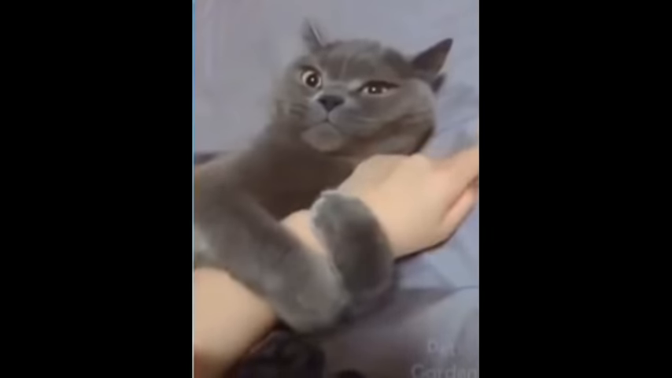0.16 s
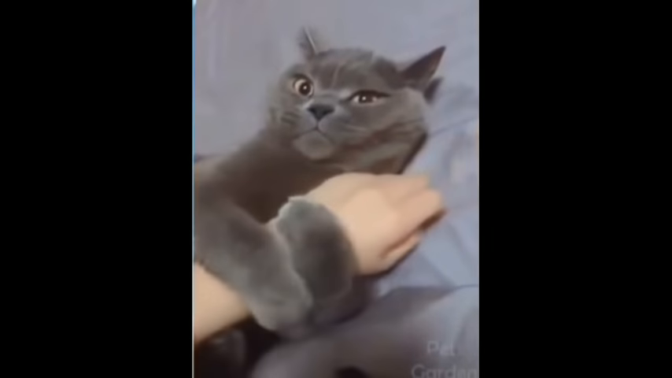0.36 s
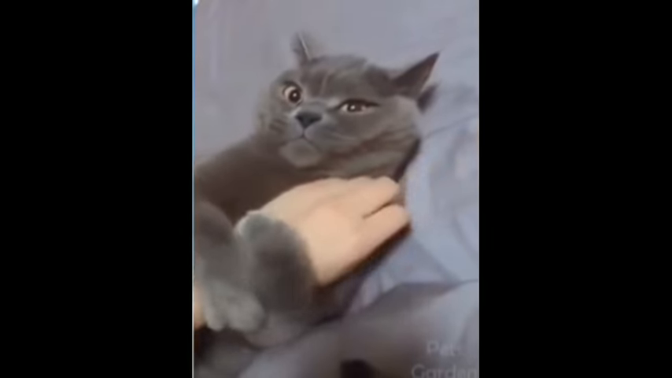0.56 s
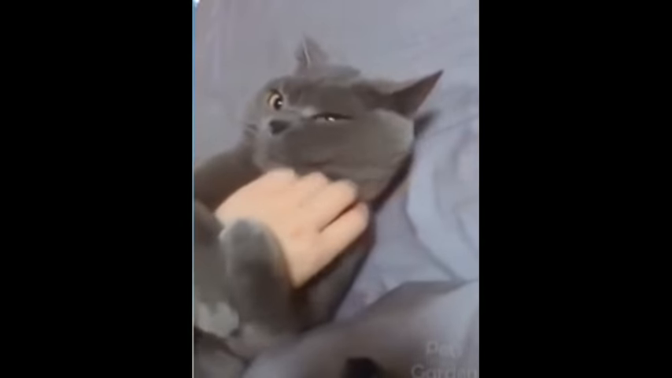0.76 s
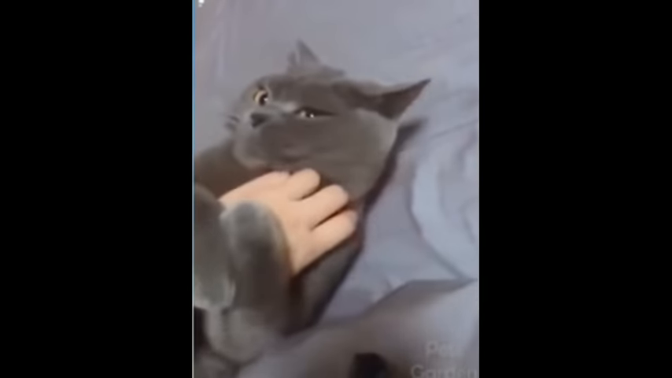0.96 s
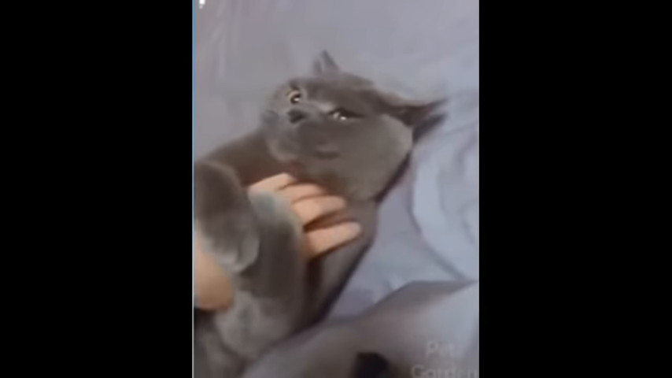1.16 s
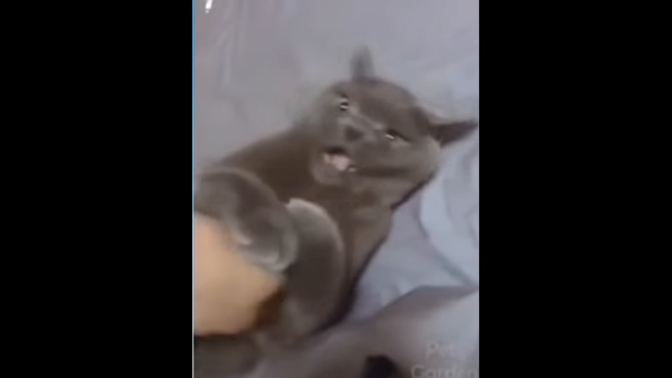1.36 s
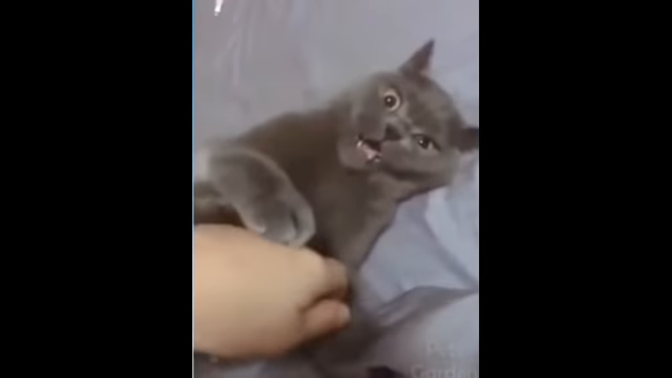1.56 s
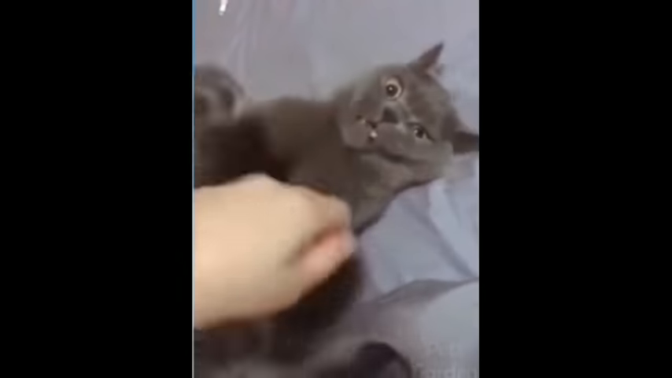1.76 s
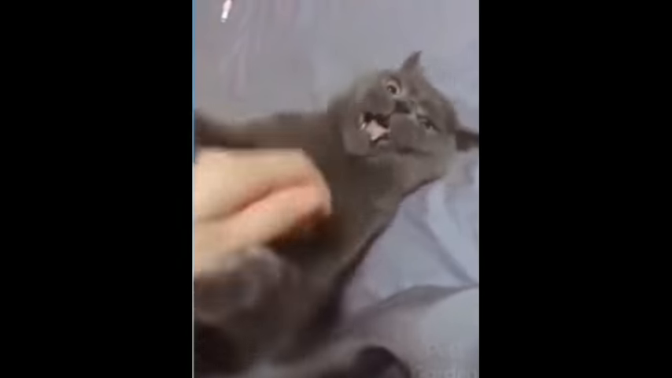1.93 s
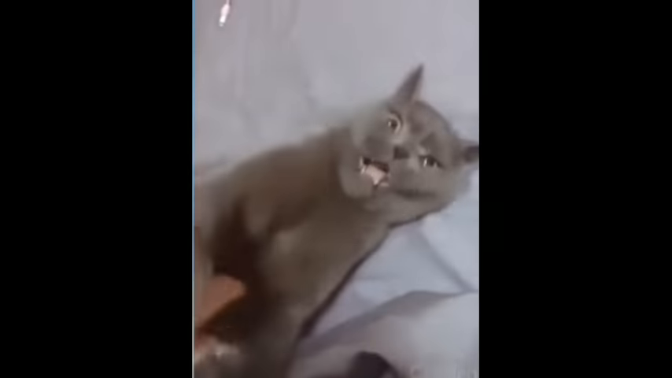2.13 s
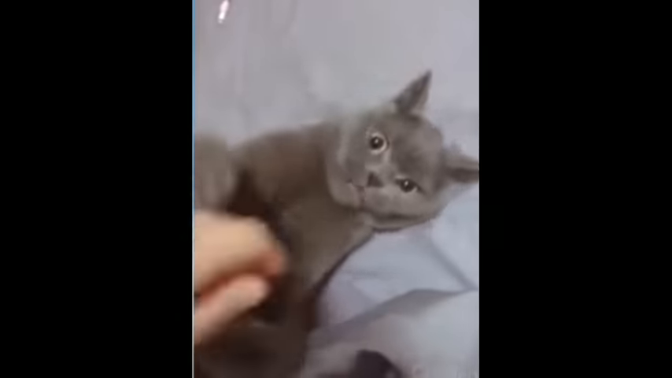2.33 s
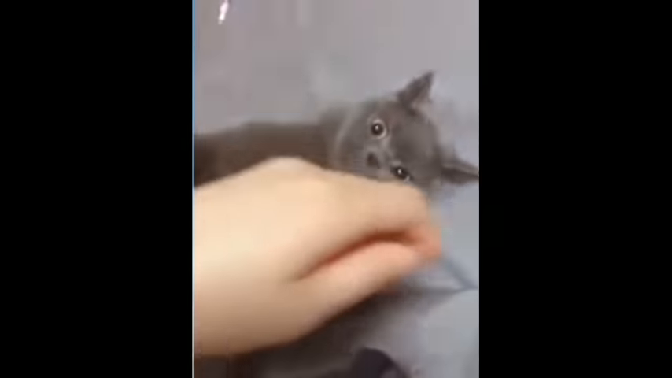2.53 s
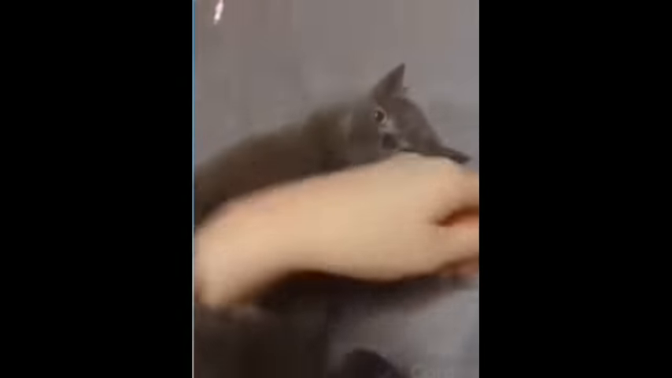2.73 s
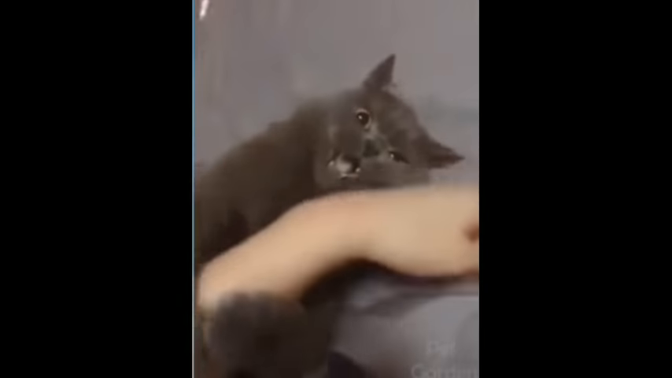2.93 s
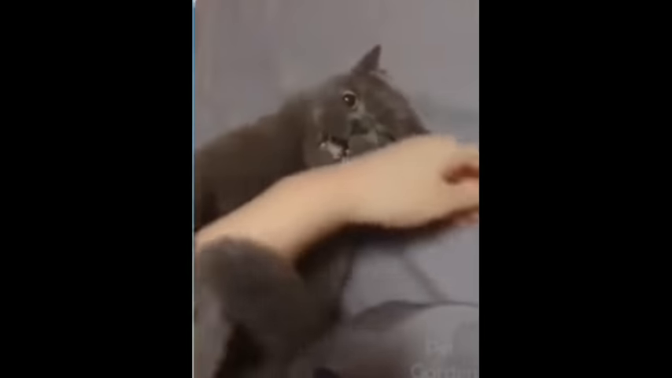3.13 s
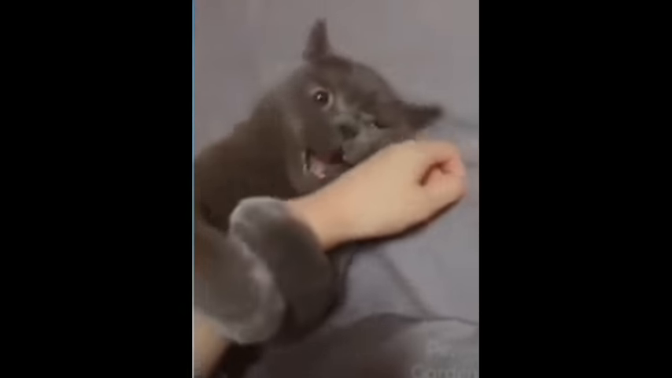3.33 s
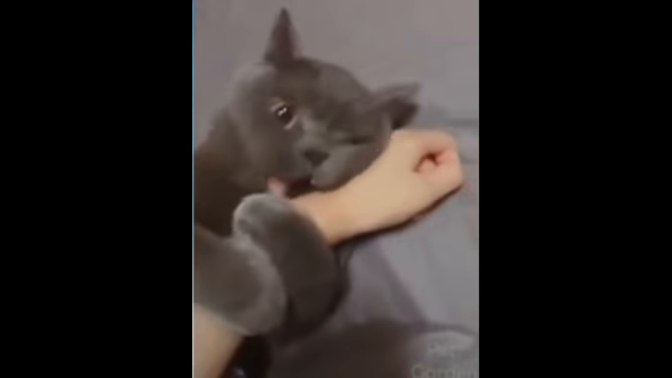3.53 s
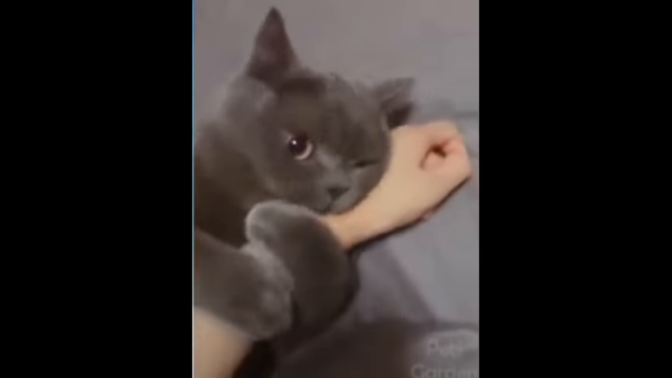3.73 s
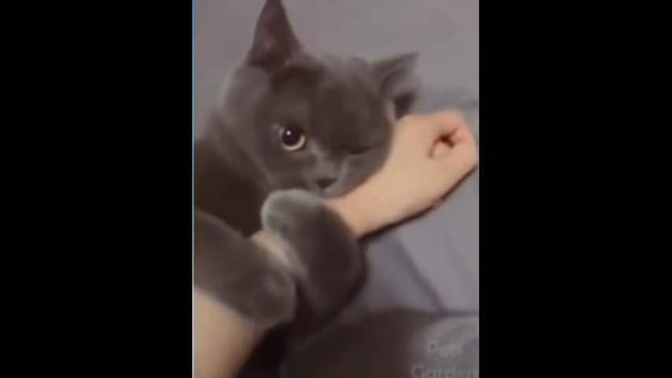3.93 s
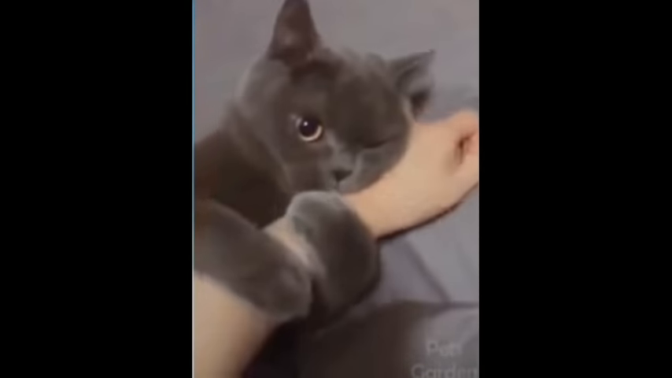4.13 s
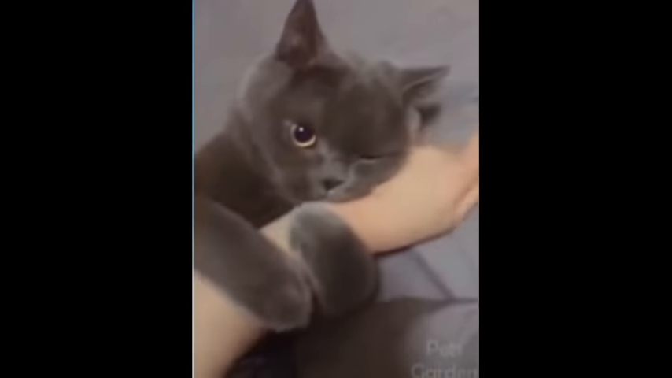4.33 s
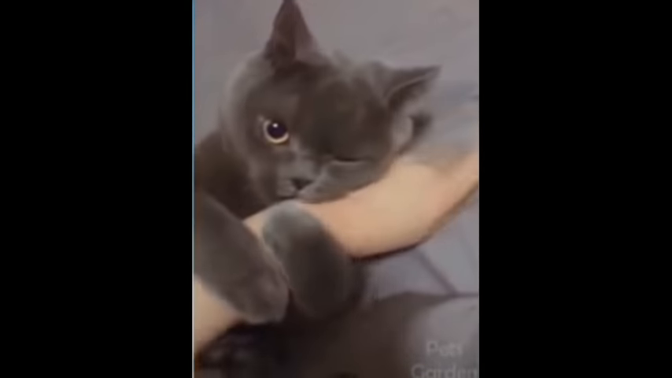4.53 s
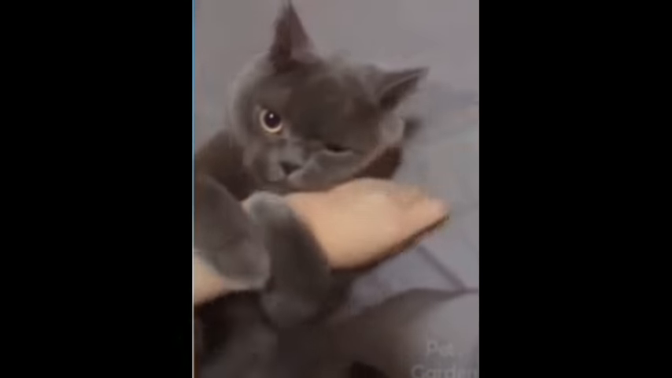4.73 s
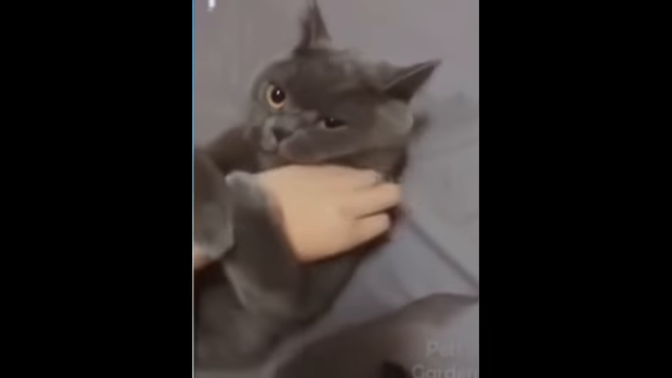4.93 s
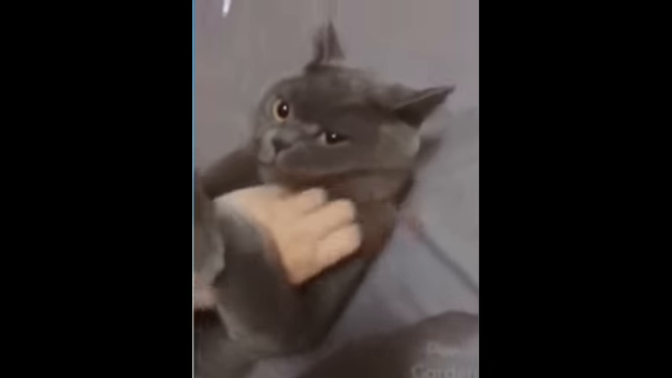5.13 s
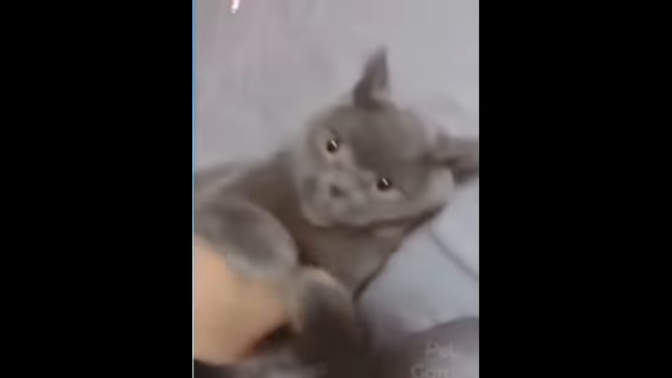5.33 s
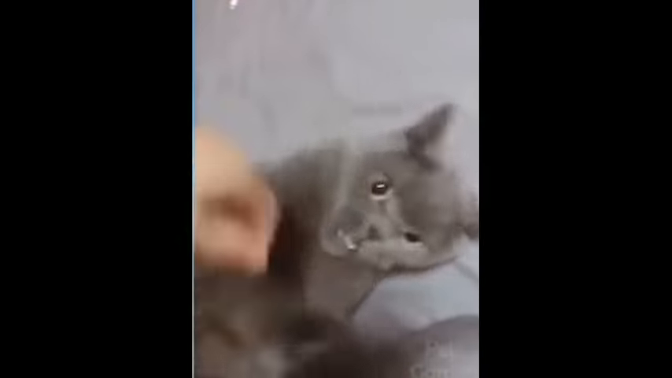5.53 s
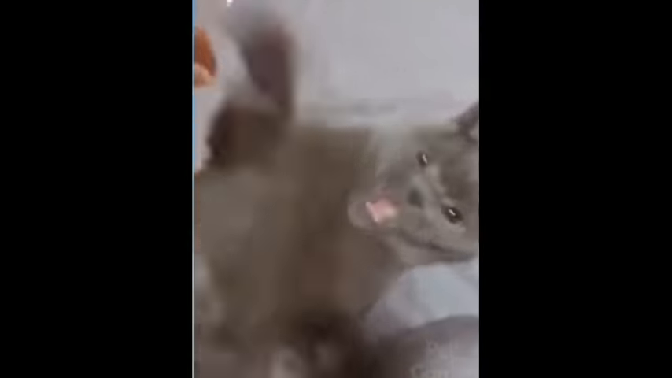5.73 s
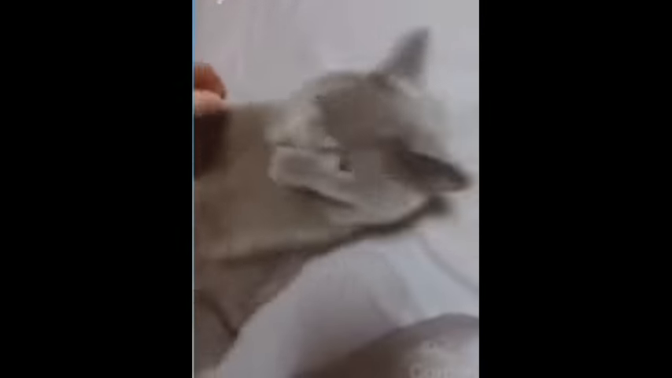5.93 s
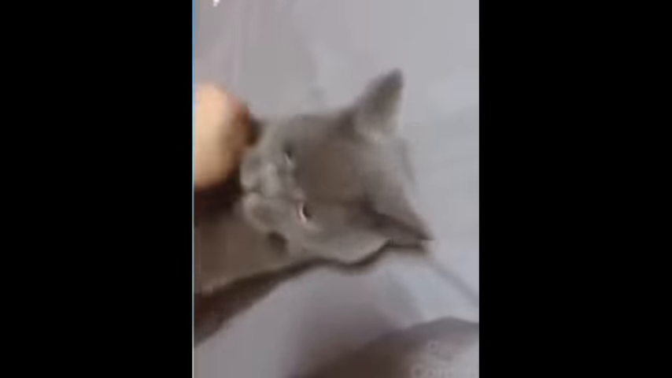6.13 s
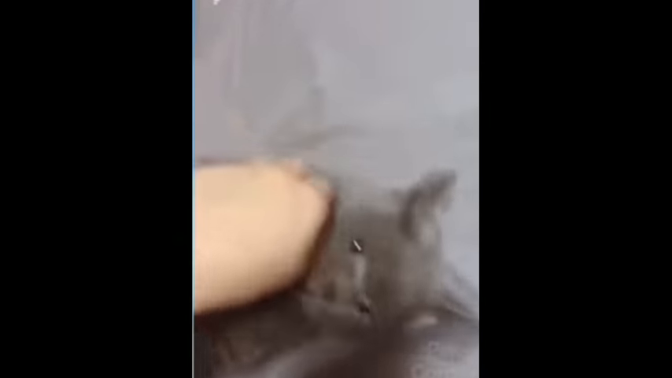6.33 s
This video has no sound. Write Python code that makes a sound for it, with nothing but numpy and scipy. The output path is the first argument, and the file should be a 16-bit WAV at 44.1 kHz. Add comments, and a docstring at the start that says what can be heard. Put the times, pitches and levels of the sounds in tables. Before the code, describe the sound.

Silence for 0.2 s, then quiet indoor room tone fades in abruptly: low rumble, a faint wavering hum and soft hiss. At about 1.0 s a cat, very close, begins a rough, creaky closed-mouth moan that dips low, then opens at 1.5 s into a bright, loud meow climbing in pitch. Without a break, two more wailing meows follow, swelling near 2.1 and 2.3 s, before closing into a nasal moan from 2.6 to 3.05 s. A last meow opens at 3.1 s and fades by 3.5 s. Quiet returns, with tiny fur and blanket rustles around 3.9 to 4.4 s. At 5.1 s a faint rising squeak accompanies a second raspy moan, growing until 5.75 s, when it breaks into a harsher, higher, piercing cry held to the end at about 6.5 s. The room adds only a short, soft echo.

```python
"""In a small room, a cat teased by a hand on a bed gives two long complaining yowls, close by.
Each starts as a rough closed-mouth moan and opens into bright meows: harmonics of the vocal folds
pass through a fixed throat and two moving resonances, and roughen where the voice cracks.
Noise bands make the rumble, air, background hiss and short rustles of fur and blanket;
swept sines make a hum and a squeak. Silence comes first, then the sound fades in quickly."""
import sys
import numpy as np
from scipy import signal
from scipy.fft import rfft, irfft, next_fast_len
from scipy.io import wavfile
from scipy.ndimage import map_coordinates

SR = 44100
rng = np.random.default_rng(int(sys.argv[2]) if len(sys.argv) > 2 else 0)


def to_wav(sig):
    """Store sig (one row per channel, or 1-D mono) as 16-bit WAV at the path in sys.argv[1].

    Samples outside -1..1 are clipped; the rate is SR.
    """
    pcm = np.clip(np.atleast_2d(sig), -1, 1) * 32767
    pcm = np.round(pcm).astype(np.int16)
    wavfile.write(sys.argv[1], SR, pcm.T)  # frames by channels


N = 285768
TIME = np.arange(N) / SR  # s
TOP_HZ = 14000  # upper band limit
SHUT_HZ, OPEN_HZ = 1155, 2640  # mouth resonance in a moan, and with the jaw wide open


def amp(db):
    """Logarithmic level: decibels to amplitude gain."""
    return 10 ** (np.asarray(db) / 20)


def unit(x):
    """Power normalization: scale to rms 1."""
    return x / np.sqrt(np.mean(x ** 2) + 1e-20)


def along(points, hz):
    """Spectral interpolation: read (f/Hz, value) points on a logarithmic frequency axis."""
    point_hz, values = np.transpose(points)
    return np.interp(np.log(hz + 1), np.log(point_hz + 1), values)


def curves(rows, t):
    """Linear interpolation in time: each column after the first, read at times t."""
    seconds, *columns = np.transpose(rows)
    return [np.interp(t, seconds, column) for column in columns]


def wobble(t, rate):
    """Band-limited random fluctuation: a smooth curve through `rate` random knots a second."""
    knots = rng.standard_normal(int(N * rate / SR) + 4)
    return map_coordinates(knots, [t * rate])


def filtered(x, response):
    """Linear filtering: multiply the spectrum of x by a response of frequency."""
    size = next_fast_len(N + SR // 2)
    hz = np.fft.rfftfreq(size, 1 / SR)
    return irfft(rfft(x, size) * response(hz), size)[:N]


def noise(spectrum):
    """Coloured noise: white noise filtered to the given spectral density, at rms 1."""
    white = rng.standard_normal(N)
    return unit(filtered(white, lambda hz: amp(along(spectrum, hz))))


def bell(hz, centre_hz, octaves):
    """Resonance: a hump of height 1 that halves `octaves` from its centre."""
    return 1 / (1 + (np.log2((hz + 1) / centre_hz) / octaves) ** 2)


def rumble():
    """Low-frequency noise whose level fluctuates slowly."""
    # relative spectral density: f/Hz, level/dB (per Hz)
    rumble_colour = [(8, -38.5), (16, 5), (22, 0), (30, -5.5), (42, -5.5), (70, -8), (100, -15.5),
                     (125, -26.5), (200, -63)]
    return amp(-34 + 0.75 * wobble(TIME, 12)) * noise(rumble_colour)


def hum():
    """Frequency modulation: a sine near 161.5 Hz that wavers in pitch and level."""
    pitch = 161.5 + 2 * wobble(TIME, 6.6)
    level = amp(-52.5 + 1.1 * wobble(TIME, 4.7))
    return level * np.sin(2 * np.pi * np.cumsum(pitch) / SR)


def room_air():
    """Broadband noise of the room, nearly steady in level."""
    # relative spectral density: f/Hz, level/dB (per Hz)
    air_colour = [(76, -54), (130, -6.5), (156, -2), (193, -2.5), (232, 0.5), (418, -10), (551, -13.5),
                  (663, -10), (717, -13.5), (995, -10.5), (1290, -11), (1920, -20), (3000, -27),
                  (3900, -62.5), (6600, -120)]
    return amp(-43.5 + 0.17 * wobble(TIME, 4.2)) * noise(air_colour)


def background_hiss():
    """Amplitude modulation: treble noise with a slowly changing level and a small flicker."""
    # mean level of the hiss: t/s, level/dB
    hiss_levels = [(.2, -52), (.98, -52.5), (1.06, -59.5), (1.5, -59.5), (2.8, -60), (3.62, -61.5),
                   (3.75, -58), (3.85, -65.5), (4.3, -61), (4.7, -62), (5.02, -56), (5.25, -58),
                   (5.7, -54.5), (6.48, -61.5)]
    # relative spectral density: f/Hz, level/dB (per Hz)
    hiss_colour = [(1500, -41.5), (2500, -7), (4000, -8), (5200, -12.5), (6600, -12.5), (8700, -16),
                   (11000, -19), (13900, -19)]
    level_db = curves(hiss_levels, TIME)[0] + 1.1 * wobble(TIME, 25)
    return amp(level_db) * noise(hiss_colour)


def background():
    """Superposition of the rumble, the hum, the room's air and the hiss."""
    return rumble() + hum() + room_air() + background_hiss()


def room(x):
    """Reverberation: convolution with noise that decays exponentially at each frequency."""
    # decay time of the furnished room: f/Hz, t60/s
    decay_times = [(200, 0.13), (2500, 0.23), (8000, 0.093)]
    hz, t, grains = signal.stft(rng.standard_normal(SR // 2), SR, nperseg=256)
    decay = amp(-60 * t / along(decay_times, hz)[:, None])
    tail = signal.istft(grains * decay, SR, nperseg=256)[1]
    tail = np.pad(tail / np.linalg.norm(tail), (round(.004 * SR), 0))  # 4 ms delay
    return signal.fftconvolve(x, tail)[:N]


def rustles():
    """Exponential decay: short rustles of fur and blanket as decaying bursts of narrow noise."""
    # rustles: t/s (start), level/dB, f/Hz (centre), t60/s
    rustle_rows = [(2.931, -49, 4980, 0.027), (3.057, -50.5, 5513, 0.046), (3.912, -50.5, 2473, 0.32),
                   (4.003, -44, 2400, 0.0448), (4.128, -49, 2500, .04), (4.237, -48, 2798, 0.0681),
                   (4.332, -49, 3540, 0.057), (5.751, -49.5, 7100, 0.071)]
    out = np.zeros(N)
    for start, db, centre_hz, t60 in rustle_rows:
        age = np.maximum(TIME - start, 0)
        white = rng.standard_normal(N)
        burst = unit(filtered(white, lambda hz: bell(hz, centre_hz, octaves=0.38)))
        attack = 1 - np.exp(-age / 0.00082)
        out += burst * amp(db - 60 * age / t60) * attack
    return out


def squeak():
    """Frequency glide: a faint rising sine with pitch jitter, around the start of the second yowl."""
    # mean glide: t/s, f/Hz, level/dB
    glide = [(5.07, 2510, -120), (5.09, 2520, -51), (5.135, 3020, -54), (5.17, 3050, -120)]
    hz, db = curves(glide, TIME)
    jittered_hz = hz * (1 + .015 * wobble(TIME, 400))
    return amp(db) * np.sin(2 * np.pi * np.cumsum(jittered_hz) / SR)


def shutness(mouth_hz):
    """Mouth resonance as a measure of the jaw: 1 when shut, 0 when wide open."""
    return np.clip((OPEN_HZ - mouth_hz) / (OPEN_HZ - SHUT_HZ), 0, 1)


def pitch_at(t):
    """Vibration rate of the vocal folds, gliding from each moan or meow into the next."""
    # mean fold rate, one list per closed-mouth moan: t/s, f/Hz
    moan_pitch = [
        [(1.05, 434.4), (1.148, 431.4), (1.168, 407), (1.228, 324), (1.27, 259.1), (1.308, 333.5),
         (1.35, 370.5), (1.388, 395), (1.44, 462)],
        [(2.6, 549), (2.66, 526.4), (2.7, 453), (2.832, 374.3), (3.05, 389.1)],
        [(5.16, 480.4), (5.204, 420.3), (5.26, 364.6), (5.294, 340.5), (5.398, 375.2), (5.42, 391),
         (5.45, 400.5), (5.6, 385.4), (5.745, 403.2)],
    ]
    # mean fold rate, one list per meow; the last two are a cry and its held end: t/s, f/Hz
    meow_pitch = [
        [(1.465, 494), (1.511, 532), (1.585, 553.3), (1.627, 632.4), (1.653, 643.4), (1.729, 701.7),
         (1.783, 621), (1.813, 630.5), (1.84, 656)],
        [(1.86, 627), (1.958, 669.7), (1.998, 611.3), (2.03, 640), (2.06, 707), (2.074, 703), (2.09, 655.5),
         (2.12, 660.9), (2.22, 724)],
        [(2.24, 734), (2.27, 705.4), (2.33, 778.3), (2.4, 768), (2.436, 717), (2.446, 706), (2.5, 652),
         (2.516, 630.0), (2.57, 582)],
        [(3.08, 434), (3.146, 504.8), (3.186, 641), (3.218, 598), (3.306, 579), (3.4, 648), (3.458, 587.5),
         (3.504, 506), (3.52, 512)],
        [(5.76, 419.5), (5.8, 543.4), (5.806, 560), (5.834, 567), (5.88, 703), (5.93, 753.1), (6.004, 809),
         (6.026, 745.3), (6.098, 761)],
        [(6.116, 922), (6.132, 896), (6.174, 873.4), (6.314, 836.6), (6.326, 813.4), (6.47, 861)],
    ]
    rows = [tuple(row) for call in moan_pitch + meow_pitch for row in call]
    return curves(sorted(rows), t)[0]


def gestures(t):
    """Articulation: effort and jaw set the source levels and resonances, interpolated between calls."""
    # moans: t/s, fundamental level/dB, overtone level/dB, treble level/dB (over the overtones)
    moans = [
        [(1.06, -37.5, -51, -36), (1.228, -39, -61, -28), (1.256, -44, -67, -20), (1.294, -44.5, -58, -31),
         (1.416, -38, -58, -22), (1.44, -31, -42.5, -36)],
        [(2.6, -38.5, -39.5, -34), (2.718, -29.5, -42.5, -24), (2.746, -30, -38, -23), (2.91, -33, -37, -34.5),
         (3.032, -35, -46, -23), (3.06, -32, -38, -29)],
        [(5.17, -43, -53, -30), (5.298, -40.5, -71, -18), (5.358, -35.5, -49, -45), (5.452, -31.5, -44.5, -35),
         (5.69, -31, -39.5, -14.5), (5.74, -32, -40, -9)],
    ]
    # meows, the last two lists being a cry and its held end: t/s, overtone level/dB,
    # mouth resonance f/Hz, treble level/dB and upper resonance level/dB (both over the overtones)
    meows = [
        [(1.49, -37.5, 1846, -27, -36), (1.562, -20.5, 2300, -22, -25), (1.59, -14.5, 2486, -16.5, -57),
         (1.638, -20, 2470, -19, -13), (1.662, -20.5, 2160, -10.5, -16), (1.736, -17, 2083, -11.5, -15.5),
         (1.746, -19.5, 2060, -8, -9), (1.772, -21.5, 2130, -16.5, -17), (1.84, -50.5, 2020, -11, -19)],
        [(1.87, -44, 1270, -16, -20), (1.882, -41, 1280, -29, -25), (1.968, -43, 1300, -35, -25),
         (1.98, -40, 1280, -44, -28), (2.002, -32, 1273, -17, -14), (2.058, -42, 1407, -26, -15),
         (2.112, -19, 2040, -14, -31.5), (2.142, -13, 2050, -17, -40), (2.19, -33.5, 2150, -21, -28)],
        [(2.236, -30, 2145, -32, -30), (2.256, -17, 2200, -17, -33), (2.284, -16, 2150, -10.5, -22.5),
         (2.316, -21.5, 2227, -7, -13), (2.396, -26.5, 2742, -14, -7.5), (2.472, -31.5, 2356, -27, -8),
         (2.498, -32, 2190, -22, -5.5), (2.54, -38.5, 1395, -31, -13), (2.56, -41, 1270, -23, -37)],
        [(3.09, -34.5, 2296, -24, -33), (3.122, -22, 2460, -18, -29), (3.156, -22.5, 2230, -11, -16.5),
         (3.22, -23, 2460, -26, -15.5), (3.284, -32.5, 1255, -26, -34), (3.34, -33, 1213, -28, -47),
         (3.408, -27.5, 1790, -25.5, -30), (3.49, -41, 1187, -36, -40), (3.52, -46, 1230, -29, -27)],
        [(5.765, -31.5, 2380, -13, -34), (5.813, -24.5, 2142, -10, -14), (5.851, -26.5, 2190, -18, -10.5),
         (5.889, -22, 1960, -8.5, -7.5), (5.957, -22, 2280, -5, -11.5), (6.003, -17, 2410, -4.5, -8),
         (6.025, -18.5, 2558, 1.5, -16), (6.055, -18.5, 2665, -3, -8), (6.1, -20.5, 2310, -1, -10)],
        [(6.12, -31, 2365, 0, -3), (6.144, -33, 2380, -0.5, -11), (6.172, -26, 2260, -5, -9.5),
         (6.294, -23, 2310, -3, -13), (6.328, -23.5, 2495, -6, -14), (6.348, -22.5, 2570, -5.5, -12),
         (6.384, -21, 2520, -5, -15), (6.47, -23.5, 2550, -10, -8)],
    ]
    # upper resonance of the mouth, one value per list of meows: f/Hz
    meow_upper_hz = [5134, 6000, 5700, 4780, 5480, 5650]
    moan_top_db, moan_upper_hz = -46, 5240  # upper resonance in a moan
    rows = [(s, base_db, db, SHUT_HZ, treble_db, moan_top_db, moan_upper_hz)
            for s, base_db, db, treble_db in np.concatenate(moans)]
    for meow, upper_hz in zip(meows, meow_upper_hz):
        for s, db, mouth_hz, treble_db, top_db in meow:
            # a shut mouth muffles the fundamental, except where the nose rings
            nose_db = 19.5 * bell(pitch_at(s), 508, octaves=0.12) - 2.5
            # the fundamental grows weakly with the treble
            base_db = -30.5 + 0.34 * (db + treble_db) + shutness(mouth_hz) * nose_db
            rows.append((s, base_db, db, mouth_hz, treble_db, top_db, upper_hz))
    return curves(sorted(rows), t)


def roughness(t, pitch):
    """Irregular fold vibration: at the onset, when slack at low pitch, and where the voice cracks."""
    # cracks: t/s, half length t/s, roughness (0-1)
    crack_rows = [(1.52, 0.037, 0.25), (1.616, .018, 0.36), (3.148, .022, 0.33), (5.831, .055, .29),
                  (6.035, 0.038, 0.18), (6.11, .02, .16)]
    taut = 0.032
    onset = 0.629 * np.exp(-((t - t[0]) / 0.458) ** 4)  # settles in about half a second
    slack = 0.264 / (1 + (pitch / 471) ** 12)
    cracks = sum(rough * np.exp(-((t - s) / length) ** 2) for s, length, rough in crack_rows)
    return np.clip(taut + onset + slack + cracks, 0, 1)


def overtone_levels(hz, mouth_hz, upper_hz, treble_db, top_db):
    """Source-filter principle: overtones (rows) weighted by the throat and two moving resonances."""
    # fixed colour of the throat: f/Hz, level/dB
    throat_colour = [(600, -15), (900, 0), (1250, 1), (2000, 7), (3000, 7.5), (3600, 1), (4300, -6),
                     (5400, -9.5), (6200, -19), (7300, -42), (8400, -51), (9800, -46), (11200, -60),
                     (13000, -63)]
    treble_edge_hz, upper_edge_hz, sheen_edge_hz = 3300, 4600, 7600
    upper_open_db, upper_shut_db = 2, 28  # height of the upper resonance
    throat_db = along(throat_colour, hz)
    mouth_db = 11 * bell(hz, mouth_hz, octaves=0.35)
    height_db = upper_open_db + shutness(mouth_hz) * (upper_shut_db - upper_open_db)
    # the upper resonance has a hollow below it
    hollow = 0.27 * bell(hz, 0.6 * upper_hz, octaves=0.063)
    upper_db = height_db * (bell(hz, upper_hz, octaves=0.037) - hollow)
    # brightness per octave rises with the treble
    tilt_db = (8 + 0.65 * treble_db) * np.log2(np.maximum(hz, SHUT_HZ) / treble_edge_hz)
    # the nose swallows the overtones just above its ring
    notch_db = -9 * bell(hz, 680, octaves=0.11)
    in_band = hz < TOP_HZ
    shape = amp(throat_db + mouth_db + upper_db + tilt_db + notch_db) * in_band
    # body, treble and upper resonance are each normalized to their own share of the power
    low, below_top = [1 / (1 + (hz / edge) ** 40) for edge in (treble_edge_hz, upper_edge_hz)]
    bands = (low, below_top - low, 1 - below_top)
    body, treble, top = [shape * band / np.linalg.norm(shape * band, axis=0) for band in bands]
    # the highest overtones come up with the upper resonance
    sheen = amp(5.5 + 0.39 * top_db + throat_db) * np.clip(hz / sheen_edge_hz, 0, 1) ** 40 * in_band
    return np.sqrt(body ** 2 + (amp(treble_db) * treble) ** 2 + (amp(top_db) * top) ** 2 + sheen ** 2)


def yowl(start, end, count=24):
    """Voiced sound: fold harmonics with jitter, shimmer and turbulence, shaped by throat and jaw."""
    # relative spectral density of the nasal rasp: f/Hz, level/dB (per Hz)
    rasp_colour = [(500, -31), (900, -8), (1180, 3.5), (1450, -3), (2400, -19), (4000, -30), (6000, -69)]
    attack_s, release_s = 0.032, 0.0065
    sounding = (TIME > start) & (TIME < end)
    t = TIME[sounding]
    pitch = pitch_at(t)
    rough = roughness(t, pitch)
    base_db, overtone_db, mouth_hz, treble_db, top_db, upper_hz = gestures(t)
    orders = np.arange(2, count + 1)
    shares = overtone_levels(orders[:, None] * pitch, mouth_hz, upper_hz, treble_db, top_db)
    # rough folds vary more in period and in how hard they close
    pitch = pitch * (1 + .003 * wobble(t, 70) + .08 * rough ** 2 * wobble(t, 260))
    closure_db = .9 * wobble(t, 50) + 7 * rough ** 2 * wobble(t, 170)
    phase = 2 * np.pi * np.cumsum(pitch) / SR
    voice = amp(base_db + 0.58 * closure_db) * np.sin(phase)
    # with rough folds, air rasps through the nose once a cycle
    voice += amp(base_db - 21) * rough * (1 + np.cos(phase)) * noise(rasp_colour)[sounding]
    # period doubling: rough folds close hard and soft in turn
    alternation = 1 + 0.34 * rough * np.sin(phase / 2)
    for order, share in zip(orders, shares):
        hz = order * pitch
        # each overtone also wavers slowly by itself
        level = share * alternation * amp(overtone_db + closure_db + 1.44 * wobble(t, 18))
        # each resonance delays the harmonics above it by up to half a turn
        mouth_delay = np.arctan((hz - mouth_hz) / 250)
        upper_delay = np.arctan((hz - upper_hz) / 300)
        angle = order * phase - mouth_delay - upper_delay
        # turbulence at the folds puts a skirt of noise around each overtone
        skirt = wobble(t, 800) * np.sin(angle) + wobble(t, 800) * np.cos(angle)
        voice += level * (np.sin(angle) + (.015 + .6 * rough) * skirt)
    envelope = np.clip(np.minimum((t - start) / attack_s, (end - t) / release_s), 0, 1)
    out = np.zeros(N)
    out[sounding] = np.sqrt(2) * voice * envelope
    return out


def scene():
    """Superposition of direct sound, reverberation and background: the cat close by, in its room."""
    # each yowl runs without a gap through moans and meows: start t/s, end t/s
    yowl_spans = [(1.03, 3.545), (5.14, 6.485)]
    close = sum(yowl(start, end) for start, end in yowl_spans) + rustles() + squeak()
    echo = amp(-13) * room(close)
    return (close + echo + background())[None]


def record(dry):
    """Fade-in and band limitation: a short silence, then the sound below TOP_HZ."""
    fade_in = np.clip((TIME - .192) / .002, 0, 1)  # silence until 0.192 s, then faded in over 2 ms
    return filtered(dry[0] * fade_in, lambda hz: hz < TOP_HZ)[None]


dry = scene()
out = record(dry)
to_wav(out)
```